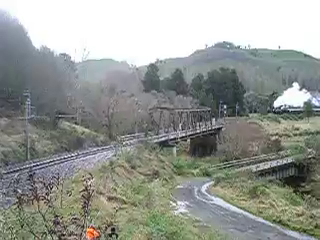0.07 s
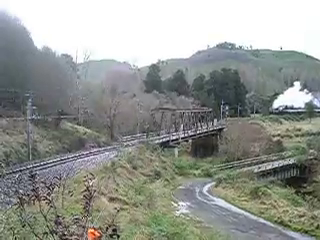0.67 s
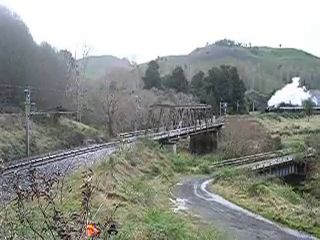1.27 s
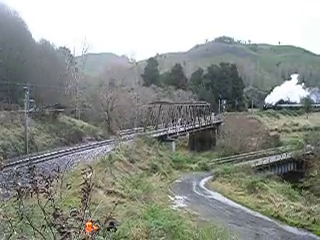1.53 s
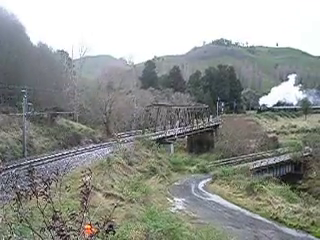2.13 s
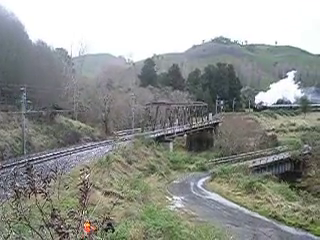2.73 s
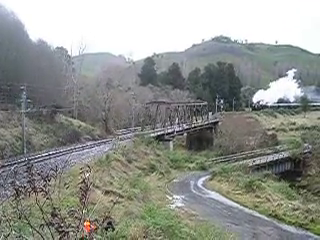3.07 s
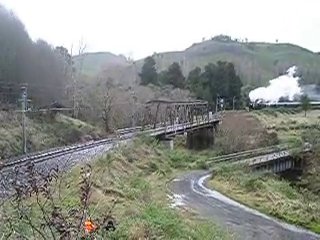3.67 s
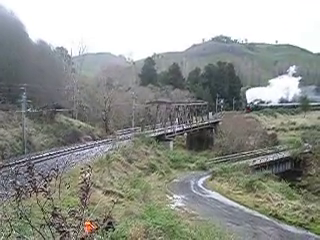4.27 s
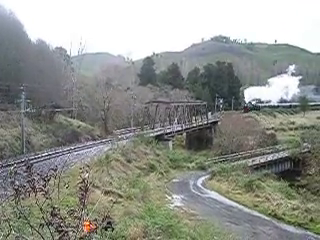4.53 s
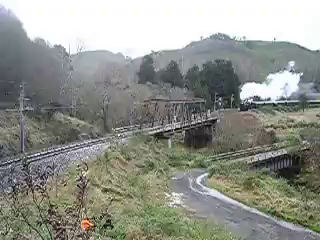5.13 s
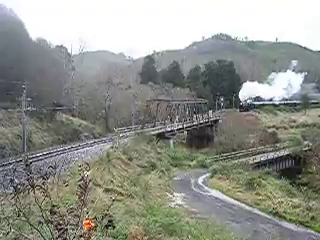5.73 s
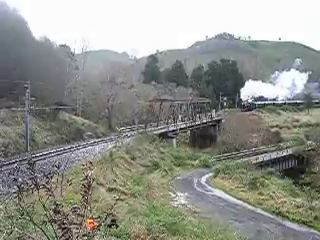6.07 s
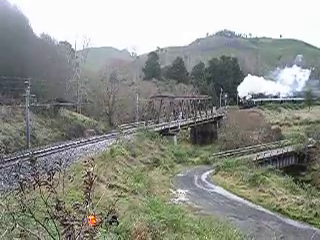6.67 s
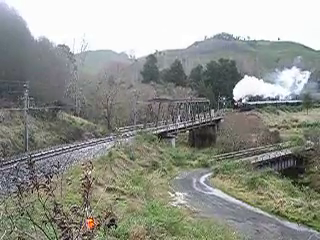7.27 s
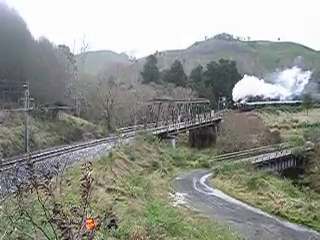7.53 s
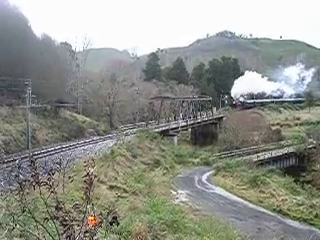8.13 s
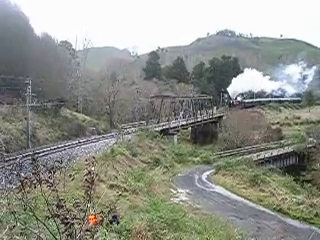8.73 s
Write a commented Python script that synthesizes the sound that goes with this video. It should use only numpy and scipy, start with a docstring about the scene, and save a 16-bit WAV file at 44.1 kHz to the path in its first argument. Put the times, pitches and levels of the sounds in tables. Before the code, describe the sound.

A sharp little pop opens onto the steady, distant rush of a valley, followed by three tiny taps close by. Far away, a steam locomotive chuffs in a fast, even rhythm, muffled at first, then louder and clearer as it comes into the open. The beats echo softly off the hills above a low carriage rumble. The microphone sounds dull and narrow, with a faint hiss, whine and buzz of its own.

```python
"""A pop as a small camera switches on, then a steam locomotive chuffing far along a valley.
Each cylinder stroke sends a turbulent jet up the chimney, four beats to a turn of the wheels, slowly
quickening, muffled at first, then clear in the open. The slopes scatter the beats back over the rumble
of the carriages and the rush of the valley. Close by are three small taps and the faint whine, buzz and
hiss of the camera, whose microphone passes only a narrow band."""
import sys
import numpy as np
from scipy import signal
from scipy.fft import rfft, irfft, next_fast_len
from scipy.io import wavfile
from scipy.ndimage import uniform_filter1d, map_coordinates

SR = 44100
rng = np.random.default_rng(int(sys.argv[2]) if len(sys.argv) > 2 else 0)


def unload_wav(signal):
    """Save mono or channel-first audio to the path in sys.argv[1] as 16-bit WAV at rate SR, clipped to [-1, 1]."""
    wavfile.write(
        sys.argv[1],
        SR,
        np.round(np.clip(np.atleast_2d(signal).T, -1, 1) * 32767).astype(np.int16),
    )


N = 387638

# the four unequal beats of a wheel turn: (boom accent [dB], rasp accent [dB])
ACCENTS = [(1, 1), (2.5, 1), (-.5, 0), (-2.5, -2.5)]


def exhaust(rise_s=.013, fall_s=.024, rasp_db=-1.35, ragged_db=1.1, scatter_db=.8, scatter_s=.0036):
    """Pulsed jet noise: each stroke releases a ragged puff of steam, a hollow boom with a rasp on top."""
    # chimney boom: (frequency [Hz], relative density [dB])
    boom_spectrum = [(70, -31.5), (130, -17), (190, -5.5), (245, 0.5), (300, -2), (340, -5), (390, -11),
                     (440, -3), (540, -11), (700, -44.5)]
    # jet rasp, dulled by distance: (frequency [Hz], relative density [dB])
    rasp_spectrum = [(380, -33), (590, -2), (700, -3.5), (820, 1), (930, -6), (1100, -6), (1400, -14),
                     (2100, -19), (3200, -50)]
    # screened, then in the open: (time [s], base boom level [dB], base rasp level [dB])
    levels = [(0, -45.5, -52.5), (3.5, -46, -52.5), (3.85, -40, -46), (4.65, -36, -42.5), (5.0, -38, -43.5),
              (6.35, -38.5, -40.5), (7.25, -37.5, -42), (7.9, -41, -45), (8.8, -36.5, -41.5)]
    knots, boom_levels, rasp_levels = np.transpose(levels)
    t = clock()
    boom, rasp = np.zeros(N), np.zeros(N)
    times, places = beats()
    for s, place, (late, strong) in zip(times, places, rng.standard_normal((len(times), 2))):
        near = slice(max(int((s - .06) * SR), 0), int((s + .2) * SR))
        # the valve opens quickly, then the cylinder empties more slowly
        puff = amp(scatter_db * strong) * swell(t[near] - s - scatter_s * late, rise_s, fall_s)
        boom_accent, rasp_accent = ACCENTS[place]
        boom[near] += amp(np.interp(s, knots, boom_levels) + boom_accent) * puff
        rasp[near] += amp(np.interp(s, knots, rasp_levels) + rasp_accent + rasp_db) * puff
    turbulence = unit(amp(ragged_db * wobble(170)))
    return turbulence * (boom * jet(boom_spectrum) + rasp * jet(rasp_spectrum))


def beats(turn_start_s=5.8855, beat_hz=9.394, gain_hz_per_s=.0933):
    """Uniform acceleration sets the time of each beat and its place in the wheel turn."""
    since = clock() - turn_start_s
    count = np.floor(beat_hz * since + .5 * gain_hz_per_s * since ** 2).astype(int)
    starts = np.flatnonzero(np.diff(count)) + 1
    return starts / SR, count[starts] % len(ACCENTS)


def hills(x, delay_s=.04):
    """Reverberation by scattering: wooded slopes return the sound, and the treble dies first."""
    # decay of the echo: (frequency [Hz], reverberation time [s])
    t60 = [(150, 0.6), (800, 0.76), (4000, .3)]
    hz, t, spectra = signal.stft(rng.standard_normal(SR), SR, nperseg=256)
    decay = amp(-60 * t / along(t60, hz)[:, None])
    tail = signal.istft(spectra * decay, SR, nperseg=256)[1]
    response = np.pad(tail / np.linalg.norm(tail), (int(delay_s * SR), 0))
    return signal.fftconvolve(x, response)[:N]


def carriages(thump_s=4.19, thump_db=-42):
    """Rolling noise: wheels rumble on the rails, and one dull thump adds to them in power."""
    # rumble: (time [s], level [dB])
    levels = [(0, -58), (1.1, -67), (3.2, -62), (4.3, -56.5), (7.0, -58), (7.35, -52), (8.8, -53)]
    # its colour: (frequency [Hz], relative density [dB])
    spectrum = [(25, -24), (55, 0.5), (88, 1.5), (120, -4.5), (170, -4), (240, -6), (400, -21),
                (900, -46.5)]
    thump = amp(thump_db) * swell(clock() - thump_s, rise_s=.027, fall_s=.066)
    return np.hypot(amp(curve(levels)), thump) * noise(spectrum)


def valley(drift_db=.25, flutter_db=.1):
    """Atmospheric fading: the far roar of the valley wavers in the moving air."""
    # roar: (time [s], level [dB])
    levels = [(0, -42), (1.1, -42.5), (3.6, -42.2), (6.5, -40.5), (8.8, -40.2)]
    # its colour: (frequency [Hz], relative density [dB])
    spectrum = [(25, -16), (60, -17), (125, -14), (170, -9.5), (205, -1), (260, -.5), (330, -3.5),
                (410, -5), (480, -3), (580, -5.5), (760, -4), (900, -8), (1100, -15), (1500, -25.5),
                (3000, -48.5)]
    level_db = curve(levels) + drift_db * wobble(5.2) + flutter_db * wobble(22)
    return amp(level_db) * jet(spectrum, even_s=.11)


def taps(rise_s=.00075):
    """Damped oscillation: each nearby tap is a dull knock of a few cycles."""
    # taps: (time [s], envelope peak [dB], pitch [Hz])
    knocks = [(.5415, -29, 725), (.5500, -27, 794), (.5670, -28, 775)]
    out, t = np.zeros(N), np.arange(SR // 50) / SR
    envelope = t / rise_s * np.exp(1 - t / rise_s)
    for s, db, hz in knocks:
        out[round(s * SR):][:len(t)] += amp(db) * envelope * np.sin(2 * np.pi * hz * t)
    return out


def camera(hiss_db=-50, speed_jitter=.0008, frame_hz=15):
    """Periodic sources give harmonics: motor whine and sensor buzz, over the microphone's hiss."""
    # motor speed: (time [s], rotation rate [Hz])
    speed = [(0, 74.1), (3.6, 74.1), (4.6, 73.6), (8.8, 73.55)]
    # motor whine: (shaft order, level [dB])
    whine_lines = [(22, -68.5), (23, -68.5), (24, -73), (29, -72), (30, -66.5)]
    # electrical buzz of the picture sensor: (multiple of the frame rate, level [dB])
    buzz_lines = [(1, -61.5), (2, -68.5), (4, -62.5), (6, -69.5), (10, -68), (14, -57.5), (76, -68.5),
                  (77, -59.5), (78, -69.5), (80, -69.5)]
    # hiss: (frequency [Hz], relative density [dB])
    hiss_spectrum = [(100, -4.5), (1000, 1.5), (1500, 0), (1850, 0), (2080, 2), (2450, -1.5), (3450, -2.5),
                     (3800, -5), (4050, -13), (4400, -30)]
    turns = np.cumsum(curve(speed) * (1 + speed_jitter * wobble(5))) / SR
    whine = tones(turns, whine_lines, waver_db=1)
    buzz = tones(frame_hz * clock(), buzz_lines, waver_db=-.4)
    return whine + buzz + amp(hiss_db) * noise(hiss_spectrum)


def pops():
    """Capacitive decay: voltage steps at switch-on leak away through the coupling capacitor."""
    # voltage steps: (time [s], signed weight, hold [s], rise [s], fall [s])
    steps = [(0.0361, -0.73, 0.00047, 0.0000032, 0.00016), (0.0367, -0.28, 0.00055, .00008, 0.0012),
             (0.1506, 0.24, 0.00044, 0.001, 0.0055)]
    out = np.zeros(N)
    for s, weight, hold, rise, fall in steps:
        age = np.maximum(clock() - s, 0)
        onset = (1 - np.exp(-age / rise)) ** 2
        leak = np.exp(-np.maximum(age - hold, 0) / fall)
        out += weight * onset * leak
    return out


def jet(spectrum, even_s=.045):
    """Steady flow carries steady power: coloured noise divided by its running rms."""
    x = noise(spectrum)
    power = np.abs(uniform_filter1d(x ** 2, int(even_s * SR)))
    return x / np.sqrt(power + 1e-6)


def noise(spectrum):
    """Spectral shaping colours white noise; the rms is 1."""
    return unit(filtered(rng.standard_normal(N), lambda hz: amp(along(spectrum, hz))))


def tones(cycles, lines, waver_db):
    """Harmonics of one cycle, each wavering a little in level."""
    return sum(np.sqrt(2) * amp(db + waver_db * wobble(3))
               * np.sin(2 * np.pi * (round(order) * cycles + rng.random())) for order, db in lines)


def swell(age, rise_s, fall_s):
    """A Gaussian rise to 1 at age 0, then a fall that becomes exponential."""
    rise = np.exp(-.5 * (age / rise_s) ** 2)
    fall = 1 / np.cosh(np.minimum(np.abs(age) / fall_s * np.sqrt(2), 20))
    return np.where(age < 0, rise, fall)


def wobble(rate):
    """A smooth random curve, rate knots a second."""
    return map_coordinates(rng.standard_normal(int(N * rate / SR) + 4), [clock() * rate])


def lowpass(x, top_hz, edge_hz):
    """A steep cut that closes fully at top_hz."""
    return filtered(x, lambda hz: np.clip((top_hz - hz) / edge_hz, 0, 1) ** 2)


def filtered(x, response):
    """Linear filtering: the spectrum of x times a frequency response."""
    size = next_fast_len(N + SR // 2)
    return irfft(rfft(x, size) * response(np.fft.rfftfreq(size, 1 / SR)), size)[:N]


def along(points, hz):
    """Interpolate (frequency [Hz], value) points on a log axis."""
    knots, values = np.transpose(points)
    return np.interp(np.log(hz + 1), np.log(knots), values)


def curve(rows):
    """Interpolate (time [s], value) rows at every sample."""
    return np.interp(clock(), *np.transpose(rows))


def clock():
    """The time of every sample."""
    return np.arange(N) / SR


def amp(db):
    """Decibels to gain."""
    return 10 ** (np.asarray(db) / 20)


def unit(x):
    """Scale to rms 1."""
    return x / np.sqrt(np.mean(x ** 2) + 1e-20)


def scene(echo_gain_db=-7.5):
    """Superposition of the engine, its echo, the valley, the carriages and the nearby noises."""
    engine = exhaust()
    echo = amp(echo_gain_db) * hills(engine)
    return (engine + echo + valley() + carriages() + taps() + camera())[None]


def record(dry, live_s=.1474, fade_s=.0059):
    """Band limiting: the camera idles, pops, then opens its narrow-band microphone."""
    live = np.clip((clock() - live_s) / fade_s, 0, 1)
    idle_hiss = amp(-67) * (1 - live) * noise([(100, 1.5), (4000, -10.5), (4500, -40)])
    narrow = lowpass(dry[0] * live + idle_hiss, top_hz=4600, edge_hz=450)
    return lowpass(narrow + pops(), top_hz=16900, edge_hz=1000)[None]


dry = scene()
out = record(dry)
unload_wav(out)
```